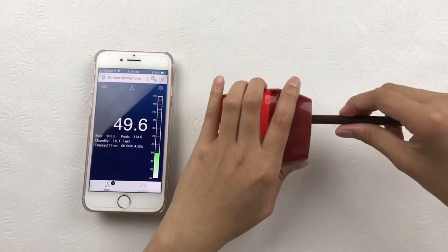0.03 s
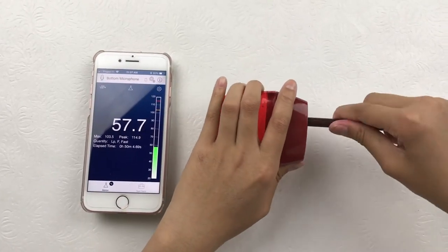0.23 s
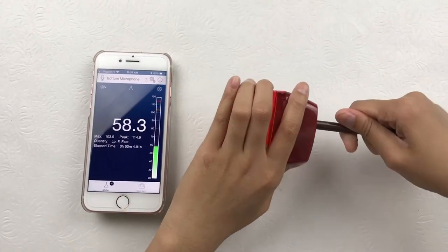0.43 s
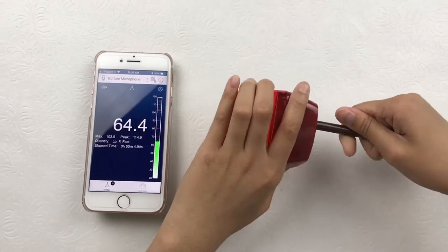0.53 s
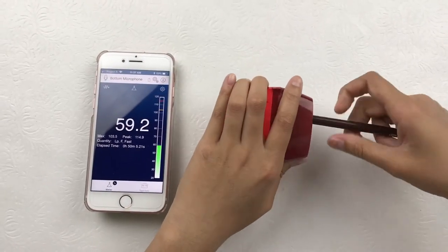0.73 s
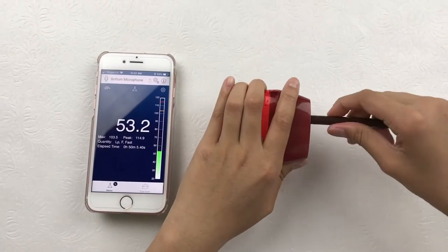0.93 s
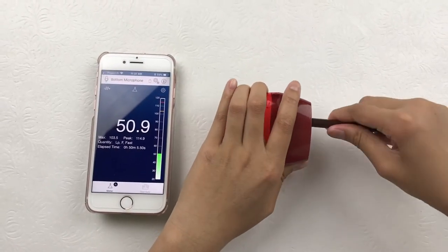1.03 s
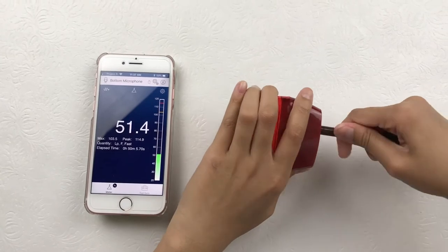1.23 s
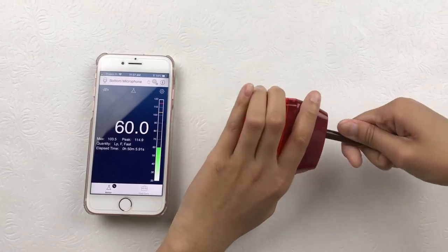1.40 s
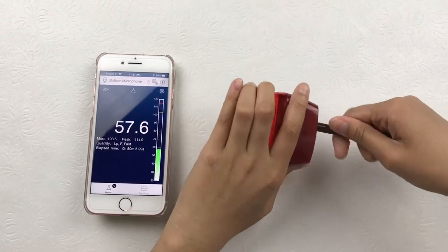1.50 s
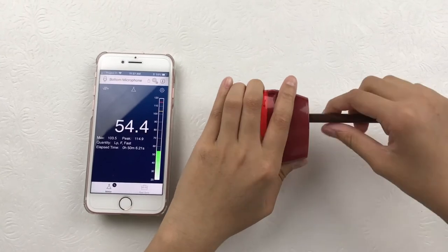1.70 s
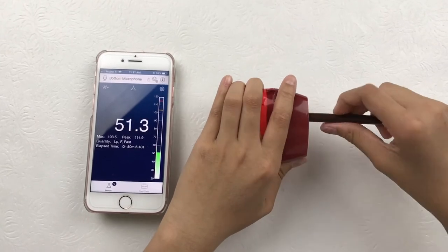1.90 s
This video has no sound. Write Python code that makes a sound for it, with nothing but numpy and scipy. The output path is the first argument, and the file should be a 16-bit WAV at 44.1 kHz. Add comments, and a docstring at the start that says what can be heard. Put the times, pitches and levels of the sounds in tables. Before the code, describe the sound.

A pencil turns in a small hand-held sharpener, rasping and snapping sharply with hollow plastic ring and dull table knocks, then a faint regrip rub, a softer second turn and another rub; close microphone, quiet humming room.

```python
"""Quiet room, one microphone close to a small plastic sharpener held on a table; an appliance hums throughout.
First a hand twists the pencil: the blade tears wood fibres in short rasps, chips snap off and the hollow
housing rings, with dull knocks on the table. Then comes a light rub as the hand takes a new grip.
A second cutting turn and a second light rub follow. Wood grains are random tiny breaks passed through
resonances; a soft low rumble comes and goes beneath, and filtered noise makes the room's rush of air."""
import sys
import numpy as np
from scipy import signal
from scipy.fft import rfft, irfft
from scipy.io import wavfile
from scipy.ndimage import uniform_filter1d

SR = 44100
rng = np.random.default_rng(int(sys.argv[2]) if len(sys.argv) > 2 else 0)


def unload_wav(signal):
    """Save mono or channel-first audio to the path in sys.argv[1] as 16-bit WAV at rate SR, clipped to [-1, 1]."""
    wavfile.write(
        sys.argv[1],
        SR,
        np.round(np.clip(np.atleast_2d(signal).T, -1, 1) * 32767).astype(np.int16),
    )


N = 85995


# Resonances of the housing and blade: f/Hz, width/Hz, level/dB
HOUSING_MODES = [(1870, 150, 4), (2023, 100, -7.5), (2897, 133, -2.5), (3290, 86, 1), (3400, 87, -3),
                 (3710, 68, -5), (4690, 120, -2.5), (5108, 217, 2), (5570, 130, 1), (5784, 130, 0),
                 (5974, 67, -1.5), (6450, 150, -7), (7410, 220, -7), (7900, 200, -7), (9040, 100, -12),
                 (12020, 110, -7.5), (14500, 400, -9)]
# Broad response of the shell between the resonances: f/Hz, level/dB
SHELL_RESPONSE = [(100, -61), (400, -15.5), (900, -17.5), (1500, -9.5), (2250, -7), (2580, -16),
                  (3500, -14), (4050, -9.5), (5000, -8.5), (8600, -11), (10000, -15), (12300, -11.5),
                  (15700, -16)]


def blade():
    """Rasps, snaps and steady rubbing at the blade all excite the same hollow housing."""
    housing = colour(SHELL_RESPONSE, HOUSING_MODES)
    return rasps(housing) + snaps(housing) + rub(housing)


# Blade catching and tearing along the grain: peak t/s, level/dB, rise t/s, fall t/s,
# then weights of the hollow tone/dB, middle ring/dB, treble/dB
RASP_EVENTS = [(0.2, -53, .001, .003, -10, -9, 4), (0.2067, -32.5, 0.002, 0.00097, 10.5, 1, -1),
               (0.218, -42.5, .003, 0.0036, -16, 6, -3), (.2630, -32, 0.0035, 0.0019, 9, 5, 2),
               (0.312, -45.5, 0.0027, 0.0022, 0.5, 3.5, 2), (.3420, -45, 0.0023, 0.0079, -3, 2.5, 2),
               (.3880, -42, 0.0043, 0.0035, 2.5, 4, 3), (0.4137, -40.5, 0.0081, 0.0028, 8.5, 3, 3.5),
               (.4320, -41, 0.0053, 0.0032, 4.5, 1, 5), (0.508, -30, 0.0031, .003, -4, -7, -5),
               (0.547, -43.5, 0.0022, 0.0019, 9, -9, 6), (.5660, -30, 0.0023, 0.009, -0.5, -2, -4.5),
               (0.596, -36.5, 0.0054, 0.0044, 0, -2, -0.5), (.6150, -50.5, 0.0044, 0.0038, 3, 3, 2),
               (0.689, -58, 0.0017, 0.003, 7, 8.5, -1), (0.782, -52.5, 0.015, 0.0025, 7.5, 9, -5),
               (1.1290, -49.5, 0.0015, 0.011, 2, -9, -9), (1.164, -47, 0.011, 0.01, 2, -5, -1),
               (1.2, -46.5, .004, 0.0022, -7, -1, -3), (1.2280, -37.5, 0.0032, 0.0023, -9, -0.5, -3),
               (1.263, -43, 0.008, 0.0065, -2.5, -2, 4), (1.297, -41.5, 0.0034, .003, 5, -8, 2),
               (1.307, -46, .003, 0.0036, 0, -12, -6), (1.3240, -41.5, 0.0056, 0.0055, -6, -11, 0),
               (1.34, -43, .003, .006, -10, -1, 7), (1.357, -40, 0.0088, .005, -4, 3, 2),
               (1.3750, -42, 0.0022, 0.001, -11, 2, 5), (1.394, -45.5, 0.0032, 0.012, -2, 4, 1),
               (1.4353, -32, 0.0077, 0.0067, -4, 2, 1), (1.486, -47.5, 0.0027, 0.0052, -6, -3, -2),
               (1.6470, -54, 0.0083, 0.009, 6.5, 1, -3), (1.7060, -44, 0.0075, .010, 3.5, 4, -7),
               (1.7320, -44.5, .005, .004, -16, 5, -8), (1.743, -56.5, 0.0042, 0.0059, 18, 0, -7),
               (1.755, -49.5, 0.0041, 0.0025, 10, 0, -8), (1.7735, -49.5, .003, .002, 10, 2, -7),
               (1.7890, -56.5, 0.0041, 0.0022, 14, 3, 1), (1.808, -48.5, 0.0077, 0.0045, -0.5, 8, -7),
               (1.831, -62.5, 0.013, 0.0037, 13.5, -1, -1)]


def rasps(housing):
    """Each tear along the grain is a swell of fibre breaks that rings the housing."""
    track = np.zeros(N)
    for at, db, rise, fall, *weights in RASP_EVENTS:
        rasp = contact(burst(rise, fall), housing, weights)
        add(track, at, undb(db) * rasp)
    return track


# Chips snapping off the blade: t/s, level/dB,
# then weights of the hollow tone/dB, middle ring/dB, treble/dB
SNAP_EVENTS = [(.2058, -15, 11, 1, -3), (0.2156, -20.5, -16, 1, -6), (0.227, -19, -7, -7, -5),
               (.2622, -17.5, 8.5, -3, -6), (.3850, -27.5, 8.5, 4, 5), (0.4105, -28, -7, 1, 6),
               (0.4262, -18.5, 4, 1, 2), (0.4448, -11, -1, 5.5, 6.5), (0.4808, -1, -1, 2.5, 3),
               (0.4893, 2.5, -21, -2.5, -4), (.5082, -9.5, -5, 4, -4), (0.523, -10.5, 3.5, 1, -3),
               (.5590, -7.5, 1.5, 3, -2.5), (0.5629, -1.5, -2.5, -3, -11.5), (.7790, -35, 6, 3, -9),
               (.9490, -38.5, -2, -1, -5), (1.0320, -36, 0, 1, -3), (1.0700, -27, 1.5, -3, -6),
               (1.1268, -33, 3, -6, -6), (1.1413, -30, 3, 3, -3), (1.1814, -20, 2, -6, -5),
               (1.2268, -20, -11, -10, 0), (1.2800, -14.5, 6.5, -8, 0.5), (1.2950, -20.5, 3, -4, 2),
               (1.3070, -23, 0, -6, 0), (1.3382, -19, 0, -11, 2), (1.3569, -21, -9, -2, 3),
               (1.3740, -25, -4, -2, 4), (1.4140, -12, -4, -2, -3), (1.4366, -10, 5.5, 3, -3.5),
               (1.7040, -28, 5, -5, -4), (1.7290, -29, 2, -1, -1)]
CRUMBLE_DB, CRUMBLE_FALL_S = 2.5, 0.0011  # crumbling against the single crack


def snaps(housing):
    """A chip breaks with one sharp crack amid a brief crumbling of fibres."""
    track = np.zeros(N)
    for at, db, *weights in SNAP_EVENTS:
        snap = undb(CRUMBLE_DB) * crumble(CRUMBLE_FALL_S)
        snap[len(snap) // 2] += 1  # the crack
        add(track, at, undb(db) * contact(unit(snap), housing, weights))
    return track


# Steady rubbing of wood on blade and cone: t/s, level/dB
RUB_LEVEL = [(.05, -79), (.19, -60.5), (.22, -60), (.30, -54), (.33, -65), (.41, -59), (.47, -63),
             (.58, -48), (.64, -68), (.98, -74.5), (1.11, -70), (1.25, -58), (1.31, -46.5), (1.40, -60),
             (1.46, -57), (1.52, -77), (1.61, -66.5), (1.72, -54), (1.86, -83)]


def rub(housing):
    """Sliding wood breaks fibres continually, more or less strongly, and rings the housing."""
    return ring(fibres(N) * undb(curve(RUB_LEVEL)), housing)


# Ranges of the hollow tone, the middle ring and the treble: low f/Hz, high f/Hz
WEIGHT_ZONES = [(1600, 2260), (2750, 3900), (9000, 26000)]
CAVITY_DB, CAVITY_T60_S = -5, 0.033


def contact(force, housing, weights_db):
    """Each spot on the blade scatters differently in the shavings box and drives the resonances in its own shares."""
    scattered = even(force + undb(CAVITY_DB) * ring(force, tail(CAVITY_T60_S)))
    sound = unit(ring(scattered, housing)) * np.sqrt(np.sum(force ** 2))
    f = np.fft.rfftfreq(len(force), 1 / SR)
    shares_db = np.zeros(len(f))
    for db, (low, high) in zip(weights_db, WEIGHT_ZONES):
        offset = (2 * f - low - high) / (high - low)  # -1 and 1 at the edges of the zone
        shares_db += db / (1 + offset ** 6)
    return irfft(rfft(sound) * undb(shares_db))


EVEN_HZ = 700  # width of the spectral averaging


def even(x):
    """Keep the fine grain of a cluster of breaks but spread its energy evenly over pitch."""
    spectrum = rfft(x)
    bins = int(EVEN_HZ * len(x) / SR)
    power = uniform_filter1d(np.abs(spectrum) ** 2, size=bins)
    return irfft(spectrum / np.sqrt(power + 1e-18), len(x))


FIBRES_PER_S, FIBRE_SPREAD_DB = 3500, 3.5


def fibres(size):
    """Wood fails in dense tiny breaks of random timing, sign and uneven size; rms one."""
    breaks = rng.random(size) < FIBRES_PER_S / SR
    signs = rng.choice([-1, 1], size)
    sizes = undb(FIBRE_SPREAD_DB * rng.standard_normal(size))
    return unit(breaks * signs * sizes) * np.sqrt(size)


EVENT_S = 0.12  # whole length of one event


def burst(rise, fall):
    """Breaks that swell to a peak of rms one, midway through the event, and die away."""
    half = int(EVENT_S * SR / 2)
    t = np.arange(-half, half) / SR
    swell = np.exp(np.minimum(t / rise, -t / fall))
    return unit(fibres(len(t)) * swell) * np.sqrt(np.sum(swell ** 2))


SNAP_RISE_S = 0.00018


def crumble(fall):
    """A sudden cluster of breaks, energy one."""
    return unit(burst(SNAP_RISE_S, fall))


# Knocks of the housing on the table: t/s, level/dB
KNOCK_EVENTS = [(0.4816, -21.5), (.4900, -22.5), (0.561, -25), (1.4371, -17.5), (1.7045, -28)]
# Dull colour of the knocks: f/Hz, level/dB
KNOCK_RESPONSE = [(100, -14), (300, -5), (500, 1), (720, -8), (1150, 1.5), (1600, -8), (3000, -25),
                  (16000, -50)]
KNOCK_FALL_S = 0.0053


def base():
    """The base knocks dully on the table, each knock a short cluster of tiny contacts."""
    knocks = np.zeros(N)
    for at, db in KNOCK_EVENTS:
        add(knocks, at, undb(db) * crumble(KNOCK_FALL_S))
    return ring(knocks, colour(KNOCK_RESPONSE))


# Soft low rumble: t/s, level/dB
RUMBLE_LEVEL = [(0, -74), (.15, -66), (.3, -58.5), (.55, -56), (.72, -58), (.83, -52.5), (.93, -70),
                (1.2, -66.5), (1.32, -59.5), (1.6, -62), (1.9, -77)]
# Colour of the rumble: f/Hz, level/dB
RUMBLE_RESPONSE = [(50, -42.5), (110, -4), (160, -4.5), (250, -4), (400, -19.5), (1000, -41), (16000, -84)]


def rumble():
    """A soft low rumble comes and goes, made of noise weighted to the bass."""
    return ring(rng.standard_normal(N), colour(RUMBLE_RESPONSE)) * undb(curve(RUMBLE_LEVEL))


# Lowest tone of the appliance: t/s, level/dB
HUM_LOWEST_LEVEL = [(0, -54.5), (.5, -59), (.9, -55.5), (1.15, -52), (1.55, -49.5), (1.95, -51.5)]
# Upper tones of the appliance: f/Hz, level/dB
HUM_UPPER_TONES = [(172.7, -65.5), (345.2, -62), (1185, -76.5)]
HUM_HZ, HUM_WAVER_DB = 58.5, 2.5


def appliance():
    """The hum is a lowest tone that swells slowly and upper tones that each waver at random."""
    hum = tone(HUM_HZ) * undb(curve(HUM_LOWEST_LEVEL))
    for hz, db in HUM_UPPER_TONES:
        hum += tone(hz) * undb(db + HUM_WAVER_DB * walk(8))
    return hum


# Colour of the room's rush of air: f/Hz, level/dB per Hz
AIR_RESPONSE = [(44, -20.5), (75, -1.5), (115, -8), (286, -7), (350, -7.5), (467, -17), (698, -17.5),
                (1110, -30), (1220, -29), (1330, -28), (1950, -30.5), (2130, -31), (2910, -33),
                (15500, -39)]
AIR_DB, AIR_LOW_HZ = -55.5, 47.3


def room_air():
    """A soft steady rush of air: coloured noise with the deepest bass cut."""
    low_cut = signal.butter(6, AIR_LOW_HZ, "high", fs=SR, output="sos")
    air = signal.sosfilt(low_cut, ring(rng.standard_normal(N), colour(AIR_RESPONSE)))
    return undb(AIR_DB) * unit(air) * np.sqrt(N)


def tone(hz):
    """Sine of rms one with a random starting phase."""
    t = np.arange(N) / SR
    return np.sqrt(2) * np.sin(2 * np.pi * (hz * t + rng.random()))


def walk(rate):
    """Slow random drift, spread near one."""
    k = int(SR / rate)
    steps = np.repeat(rng.standard_normal(N // k + 1), k)
    return uniform_filter1d(steps, k)[:N]


def colour(points, modes=()):
    """Causal ring, energy one, of a broad spectrum with resonances on top."""
    size = 8192
    f = np.maximum(np.fft.rfftfreq(size, 1 / SR), 1)
    hz, db = np.array(points).T
    power = undb(np.interp(np.log(f), np.log(hz), db)) ** 2
    for centre, width, peak in modes:
        power = power + undb(peak) ** 2 / (1 + ((f - centre) / width) ** 2 * 2) ** 2
    # the one-sided cepstrum gives minimum phase: the ring starts at once
    cepstrum = irfft(np.log(power))[:size // 2]
    cepstrum[0] /= 2
    return unit(irfft(np.exp(rfft(cepstrum, size)))[:size // 2])


def ring(x, response):
    """Pass a sound through a response."""
    return signal.fftconvolve(x, response)[:len(x)]


def tail(t60):
    """Dense reflections dying by 60 dB in t60 seconds, energy one."""
    t = np.arange(int(t60 * SR)) / SR
    return unit(rng.standard_normal(len(t)) * np.exp(-np.log(1000) * t / t60))


def add(track, at, sound):
    """Lay a sound into the track, centred on a time in seconds."""
    where = int(at * SR) - len(sound) // 2 + np.arange(len(sound))
    inside = (where >= 0) & (where < N)
    track[where[inside]] += sound[inside]


def curve(rows):
    """Join (s, value) points by straight lines."""
    return np.interp(np.arange(N) / SR, *np.array(rows).T)


def undb(db):
    """Decibels to gain."""
    return 10 ** (np.asarray(db) / 20)


def unit(x):
    """Scale to an energy of one."""
    return x / np.sqrt(np.sum(x ** 2))


ROOM_DB, ROOM_T60_S = -15.5, 0.26


def scene():
    """The sharpener close by, its short echo in the room, and the background."""
    near = blade() + base()
    echo = undb(ROOM_DB) * ring(near, tail(ROOM_T60_S))
    return (near + echo + rumble() + appliance() + room_air())[None]


TOP_HZ = 15650


def record(dry):
    """The recorder cuts the top with a steep low-pass filter."""
    top_cut = signal.ellip(10, .2, 70, TOP_HZ, fs=SR, output="sos")
    return signal.sosfilt(top_cut, dry)


dry = scene()
out = record(dry)
unload_wav(out)
```